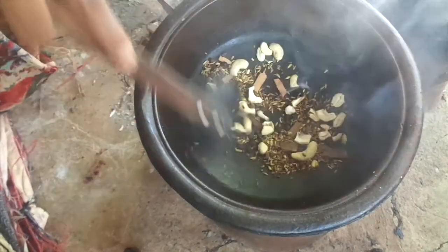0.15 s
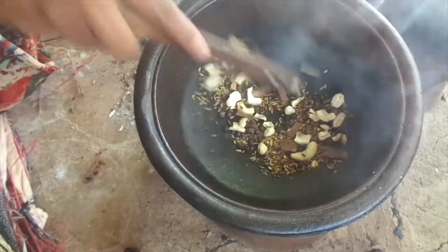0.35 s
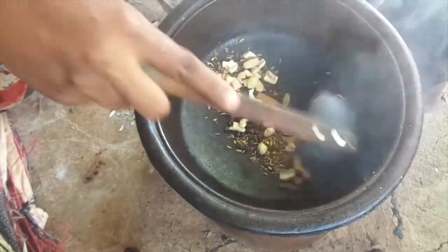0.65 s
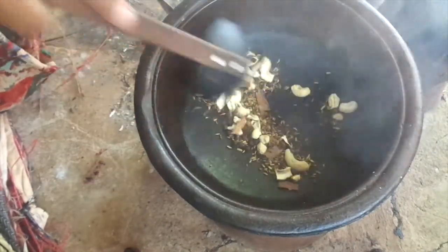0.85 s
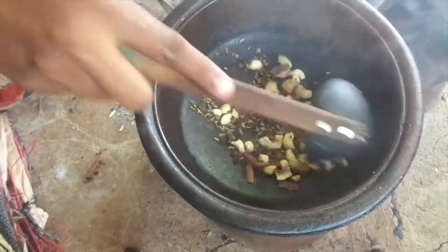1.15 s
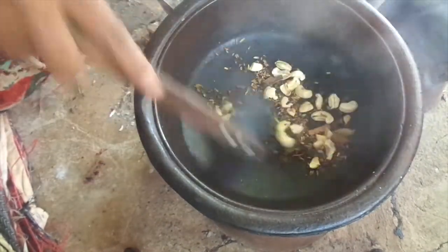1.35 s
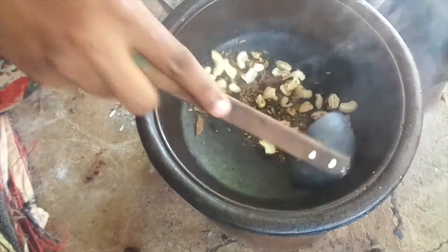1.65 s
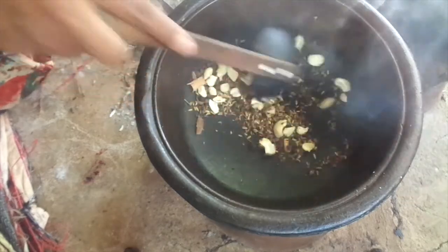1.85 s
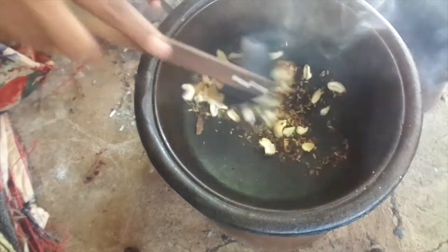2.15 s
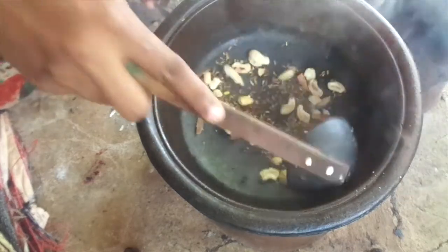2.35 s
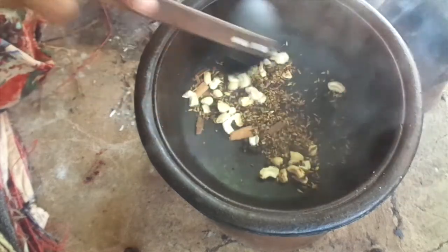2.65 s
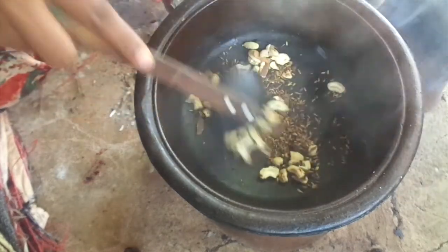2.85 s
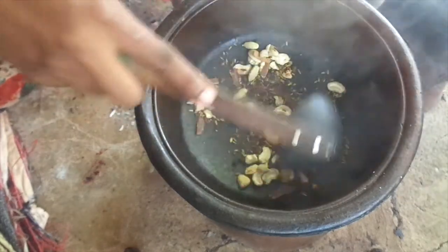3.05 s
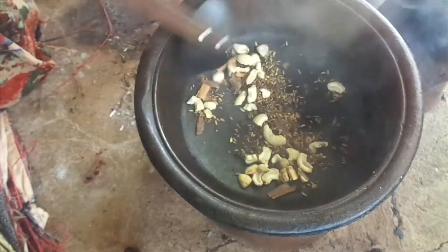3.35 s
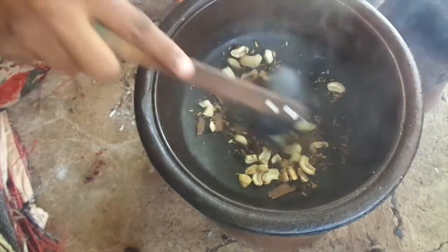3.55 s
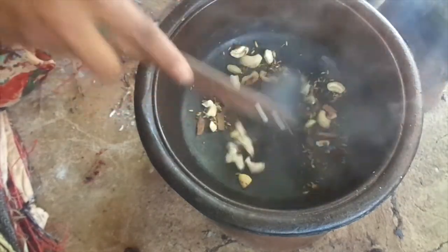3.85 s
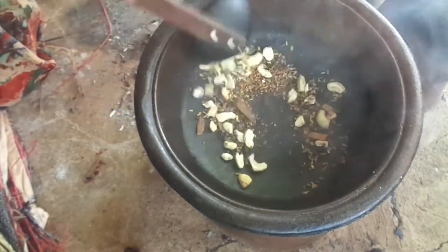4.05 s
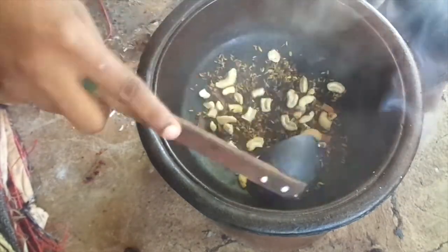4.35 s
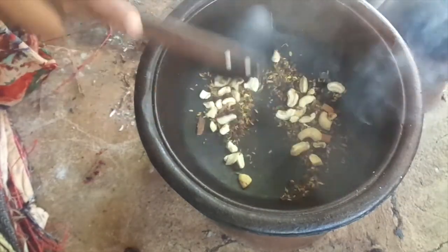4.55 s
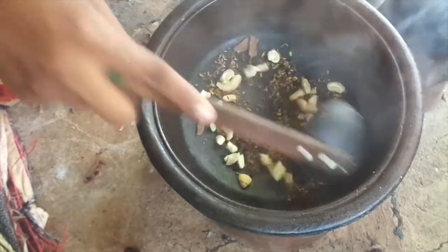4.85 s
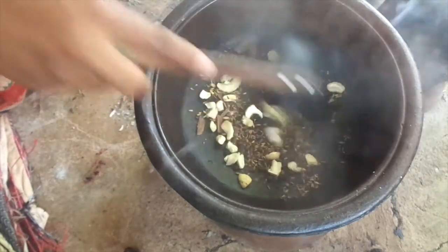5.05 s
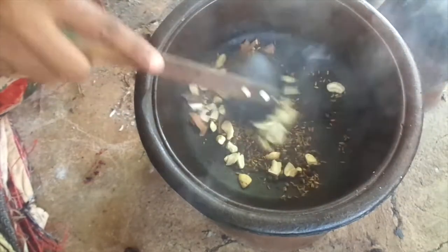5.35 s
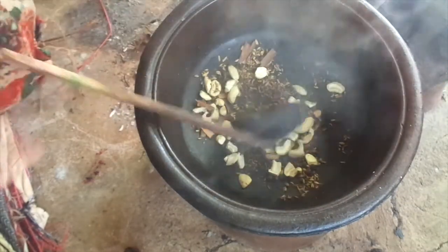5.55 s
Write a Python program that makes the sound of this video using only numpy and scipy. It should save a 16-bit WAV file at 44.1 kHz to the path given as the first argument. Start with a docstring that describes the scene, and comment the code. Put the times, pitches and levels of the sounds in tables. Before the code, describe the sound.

Close, dry scraping strokes of a metal ladle in an earthen pot, with hollow knocks, rustling seeds, sharp ticks and brief squeaks.

```python
"""A ladle stirs nuts and whole spices dry-roasting in a clay pot, close up, in mono.
About three strokes a second: filtered random contacts make its grinding, its rasp and the sliding seeds.
Knocks and a clink are damped modes with noise, squeals are resonated slips, snaps are tiny filtered bursts.
A faint echo and quiet open air surround the pot; near the start the sound drops out for a moment."""
import sys
import numpy as np
from scipy import signal
from scipy.fft import rfft, irfft, next_fast_len
from scipy.io import wavfile
from scipy.ndimage import uniform_filter1d, map_coordinates

SR = 44100
rng = np.random.default_rng(int(sys.argv[2]) if len(sys.argv) > 2 else 0)


def write(x):
    x = np.atleast_2d(x).T
    wavfile.write(sys.argv[1], SR, np.round(np.clip(x, -1, 1) * 32767).astype(np.int16))


N = 252252  # length in samples

PAUSE_START_S, PAUSE_END_S = 0.165, 0.196  # the momentary silence
TOP_HZ = 15400  # upper edge of the sound


def amp(db):
    """Decibels to gain."""
    return 10 ** (np.asarray(db) / 20)


def unit(x):
    """Scale to rms 1."""
    return x / np.sqrt(np.mean(x ** 2) + 1e-20)


def burst(x, span):
    """Scale a short sound to the energy of rms 1 held for span seconds."""
    return x * np.sqrt(span * SR / (np.sum(x ** 2) + 1e-20))


def add(track, s, sound):
    """Mix a sound in at s seconds."""
    start = max(round(s * SR), 0)
    part = track[start:start + len(sound)]
    part += sound[:len(part)]


def shaped(x, gain):
    """Filter x by a gain over frequency, with minimum phase so that attacks stay sharp."""
    size = 2 * next_fast_len(len(x) // 2 + 2048)
    wanted = np.maximum(gain(np.fft.rfftfreq(size, 1 / SR)), 1e-6)
    cepstrum = irfft(np.log(wanted))
    # folding the cepstrum onto positive time makes the filter causal
    cepstrum[1:size // 2] *= 2
    cepstrum[size // 2 + 1:] = 0
    response = np.exp(rfft(cepstrum))
    return irfft(rfft(x, size) * response)[:len(x)]


def coloured(x, points):
    """Filter x by a gain curve of (Hz, dB) points, joined on a log frequency axis."""
    f, db = np.transpose(points)
    return shaped(x, lambda hz: amp(np.interp(np.log(hz + 1), np.log(f), db)))


def hump(hz, centre, q):
    """Gain of one resonance."""
    return 1 / np.sqrt(1 + (q * (hz / centre - centre / (hz + 1))) ** 2)


def wobble(rate):
    """A smooth random curve, rate knots a second."""
    knots = rng.standard_normal(int(N * rate / SR) + 4)
    return map_coordinates(knots, [np.arange(N) * rate / SR])


def grains(count, rate, spread_db):
    """Tiny contacts over count samples: random moments, rate a second on average, random sizes and signs."""
    size_db = spread_db * np.clip(rng.standard_normal(count), -2, 2)
    sizes = amp(size_db) * rng.choice([-1, 1], count)
    return unit(sizes * (rng.random(count) < rate / SR))


def fading(t, t60):
    """Noise that dies away by 60 dB in t60 seconds."""
    return rng.standard_normal(len(t)) * amp(-60 * t / t60)


def ring(t, modes, length, scatter_db):
    """Damped modes; every blow lands elsewhere and shares its strength out anew."""
    hz, db, t60 = np.transpose(modes)[:, :, None]
    signs = rng.choice([-1, 1], hz.shape)
    strength = amp(db + scatter_db * rng.standard_normal(hz.shape)) * signs
    decay = np.exp(-np.log(1000) * t / (t60 * length))
    return np.sum(strength * np.sin(2 * np.pi * hz * t) * decay, axis=0)


# gain curve of the open air: freq_hz [Hz], level_db [dB]
AIR_CURVE = [(25, -24), (100, -1), (250, -1.5), (480, 2), (900, 1), (2500, -11), (6000, -11.5),
             (15000, -23)]


def outdoors():
    """Quiet open air as filtered noise, with a soft rush before the stirring starts."""
    air = amp(-55.5) * unit(coloured(rng.standard_normal(N), AIR_CURVE))
    rush_curve = [(60, -8), (400, -3), (1500, 3.5), (4000, -13.5)]
    rush = amp(-54) * unit(coloured(rng.standard_normal(N), rush_curve))
    return air + rush * (np.arange(N) / SR < PAUSE_START_S)


# modes of a light metal clink; the player shortens every decay to 0.8:
# freq_hz [Hz], level_db [dB, relative], t60_s [s, before shortening]
CLINK_MODES = [(1187, -14.5, 0.19), (1330, -21, 0.18), (1390, -21, 0.11), (2890, -7, 0.1), (4020, 0, 0.039),
               (5040, -14, 0.096), (5900, -18, 0.087), (7870, -17, 0.11)]


def clink():
    """A utensil is touched once: its metal modes ring over a tap of dying noise."""
    out, t = np.zeros(N), np.arange(SR // 5) / SR
    tap_curve = [(300, -38), (900, -4), (1400, 10.0), (4000, -7), (12000, -12)]
    tap = coloured(fading(t, t60=0.087), tap_curve)
    metal = unit(ring(t, CLINK_MODES, length=0.8, scatter_db=1)) + 0.8 * unit(tap)
    add(out, 0.0235, amp(-28) * burst(metal, span=0.0099))
    return out


def surroundings(x):
    """The pot and the ground throw back a short echo: x convolved with a dying noise tail."""
    t = np.arange(SR // 3) / SR
    onset = 1 - np.exp(-t / 0.011)
    tail_curve = [(100, -7), (500, -11.0), (3000, -18.5), (14000, -17.5)]
    tail = coloured(fading(t, t60=0.25) * onset, tail_curve)
    return signal.fftconvolve(x, tail / np.linalg.norm(tail))[:N]


def scuffs(rate, spread_db, t60):
    """Tiny contacts that each leave a short puff of noise."""
    t = np.arange(SR // 20) / SR
    puff_power = amp(-120 * t / t60)  # power, so the sound itself falls 60 dB in t60
    power = signal.fftconvolve(grains(N, rate, spread_db) ** 2, puff_power)[:N]
    return unit(np.sqrt(np.abs(power)) * rng.standard_normal(N))


def pings(count, pitch_hz, cycles, spread_db):
    """Seeds colliding as damped sines, each with its own moment, pitch and size."""
    when, pitch, size = rng.random((count, 3)).T[:, :, None]
    hz = pitch_hz * 2 ** (1.8 * (pitch - 0.5))  # 0.9 octave either way
    t = np.arange(SR // 100) / SR
    waves = amp(spread_db * size ** 2) * np.sin(2 * np.pi * hz * t) * np.exp(-hz * t / cycles)
    places = (when * N).astype(int) + np.arange(len(t))
    return unit(np.bincount(places.ravel(), waves.ravel(), N)[:N])


def wandering(x, depth_db):
    """The moving contact brings out different resonances from moment to moment."""
    z = signal.stft(x, nperseg=256)[2]
    field = uniform_filter1d(rng.standard_normal(z.shape), size=2, axis=0)  # across frequency
    field = uniform_filter1d(field, size=7, axis=1)  # across time
    return signal.istft(z * amp(depth_db * unit(field)), nperseg=256)[1][:N]


# strokes of the ladle; levels are for the end of the push, before the sag and the judder:
# start_s [s], push_s [s], fade_s [s per 20 dB], swell_db [dB over the push, negative weakens],
# grind_db [dB], rasp_db [dB], seeds_db [dB]
STROKE_TABLE = [(0.183, 0.21, 0.2, 10, -24, -34, -36), (0.614, .15, 0.05, 20, -28.5, -34, -37.5),
                (0.96, 0.098, 0.14, 10, -34.5, -32, -36), (1.261, 0.14, 0.15, 5.5, -25, -31, -34),
                (1.707, 0.11, 0.14, 19, -28.5, -27.5, -30.5), (2.102, 0.067, 0.17, 1.5, -36.5, -32, -36.5),
                (2.384, 0.099, 0.16, 13.5, -42.5, -39, -40.5), (2.733, 0.074, 0.41, 12, -42.5, -37, -42.5),
                (3.086, .1, 0.19, 6, -43.5, -41, -43.5), (3.433, 0.053, 0.11, 17, -35, -27.5, -32),
                (3.742, 0.11, 0.13, 3.5, -30.5, -34.5, -41), (4.08, 0.093, 0.11, 20.5, -29, -29.5, -33),
                (4.346, 0.15, .16, 4, -37.5, -41, -47), (4.712, 0.021, 0.17, -5, -36, -30.5, -38),
                (4.951, 0.024, 0.21, -9, -30, -40.5, -39.5), (5.02, 0.042, 0.13, 5.5, -26, -31, -37.5),
                (5.26, 0.094, 0.08, 7.5, -36.5, -31, -38), (5.52, 0.025, 0.1, 14, -42, -45, -56)]
STIR_START_S = STROKE_TABLE[0][0]
TOUCH_S = 0.007  # the edge settles on the clay
IDLE_SWING_DB = 4  # scale of the random swing between strokes


def effort(stroke_db, sag_db_per_s, idle_db):
    """Gain of one sound: strokes touch down, swell or weaken over the push, then fade as the ladle lifts."""
    t = np.arange(N) / SR
    power = amp(idle_db + IDLE_SWING_DB * wobble(12)) ** 2 * (t > STIR_START_S)
    for (start_s, push_s, fade_s, swell_db, *_), level_db in zip(STROKE_TABLE, stroke_db):
        pushed = np.clip(t - start_s, 0, push_s)
        lifted = np.maximum(t - start_s - push_s, 0)
        shape_db = swell_db * (pushed / push_s - 1) - sag_db_per_s * pushed - 20 * lifted / fade_s
        touch = np.clip((t - start_s) / TOUCH_S, 0, 1)
        power = power + (touch * amp(level_db + shape_db)) ** 2
    return np.sqrt(power)


# gain curves of the grinding, the rasp and the sliding seeds: freq_hz [Hz], level_db [dB]
GRIND_CURVE = [(40, -41), (140, -22), (220, -12), (310, -11), (390, -3.5), (520, 5.5), (640, 0.5),
               (800, -6), (1050, -12.5), (1350, -8), (1650, -29), (2600, -44)]
RASP_CURVE = [(1000, -15.5), (1600, -10.5), (1900, -2), (2150, 1.5), (2400, 3), (2850, 7.5), (3300, -0.5),
              (4200, 0), (5200, -5.5), (7500, -25)]
SEEDS_CURVE = [(2500, -28), (5000, -5.5), (6500, -2), (8500, 0), (11500, -2), (13500, -4), (15500, -27)]
# modes of the ladle, rung by its scraping edge: freq_hz [Hz], level_db [dB, relative]
LADLE_MODES = [(2140, 3), (2560, -3.5), (2860, -4), (3230, -5), (3540, -1), (4250, -6)]
GRIP_DB = 5.5  # scale of the swing in grip on each ladle mode
GRIND_SAG_DB_PER_S, SEEDS_SAG_DB_PER_S = 65.5, 13.5  # the edge skims and the heap thins out in a push
IDLE_GRIND_DB, IDLE_RASP_DB, IDLE_SEEDS_DB = -53.5, -54, -58  # drifting back among rolling seeds
BUMP_DB, HEAVY_PUSH_DB = -34.5, -30  # bumping level when the grinding gain is at the second figure
BUMP_GROWTH = 1.8  # dB of bumping gained per dB of grinding


def stirring():
    """In each stroke coarse bumps shake the bowl, grit rasps under the edge, and seeds tumble ahead."""
    *_, grind_db, rasp_db, seeds_db = np.transpose(STROKE_TABLE)
    pressure = effort(grind_db, GRIND_SAG_DB_PER_S, IDLE_GRIND_DB)
    judder = wobble(70)  # the pressure of the edge is never even
    grit = scuffs(rate=700, spread_db=5, t60=0.023)
    nuts = scuffs(rate=60, spread_db=3, t60=0.008)

    # the lowest notes of the bowl come up with a heavy push
    hollow_gain = lambda hz: hump(hz, 333.4, q=5.7) ** 2 + 0.32 * hump(hz, 252, q=2.5) ** 2
    hollow = unit(shaped(grains(N, rate=330, spread_db=3), hollow_gain))
    bumping = hollow * amp(BUMP_DB) * (pressure / amp(HEAVY_PUSH_DB)) ** BUMP_GROWTH

    grind = unit(coloured(grains(N, rate=300, spread_db=3) + 0.36 * nuts, GRIND_CURVE))

    singing = np.zeros(N)
    for mode_hz, mode_db in LADLE_MODES:
        contacts = grains(N, rate=1500, spread_db=2)
        mode = shaped(contacts, lambda hz: amp(mode_db) * hump(hz, mode_hz, q=72))
        singing += mode * amp(GRIP_DB * wobble(14))
    scrape = unit(wandering(coloured(grit + 0.6 * nuts, RASP_CURVE), depth_db=5.5))
    rasp = unit(scrape + 0.63 * unit(singing))

    ticks = pings(count=9000, pitch_hz=7600, cycles=5, spread_db=15)
    seeds = unit(coloured(0.9 * ticks + grit + 0.35 * nuts, SEEDS_CURVE))

    return (grind * pressure * amp(1.93 * judder)
            + bumping
            + rasp * effort(rasp_db, 0, IDLE_RASP_DB) * amp(1.36 * judder)
            + seeds * effort(seeds_db, SEEDS_SAG_DB_PER_S, IDLE_SEEDS_DB) * amp(judder))


# ladle against the pot: start_s [s], boom_db [dB], thud_db [dB], wall_db [dB],
# bright_hz [Hz, centre of the wall sound's emphasis], length [share of the modes' t60]
KNOCK_TABLE = [(0.2273, -33, -33, -63, 2800, 0.31), (0.2512, -28, -30.5, -43, 1320, 2.5),
               (0.5722, -24, -47, -49, 1220, 0.63), (.631, -51, -34, -51, 2970, 0.3),
               (.747, -26, -29, -51, 2160, 0.19), (0.9448, -22, -37, -9.5, 1790, 0.11),
               (.949, -29, -17, -15.5, 1870, 0.62), (1.2557, -21.5, -28, -33, 1230, 0.62),
               (1.366, -26.5, -27, -54, 2500, 0.68), (2.121, -34, -29, -58, 2500, 0.27),
               (2.385, -36.5, -34, -54, 1300, 0.81), (2.402, -36.5, -34, -46, 1300, 0.32),
               (2.571, -50, -51, -39.5, 1580, 1.3), (2.724, -15.5, -23.5, -8.5, 1530, 0.78),
               (3.138, -34, -15.5, -23, 1410, 0.21), (3.367, -18.5, -24.5, -14.5, 1300, 0.73),
               (3.4319, -24, -10, -19, 1350, 0.27), (3.6981, -16.5, -29, -35.5, 1230, 1.1),
               (3.754, -20.5, -29, -46, 1250, 0.69), (4.0615, -17, -26.5, -8.5, 2200, 0.82),
               (4.41, -42, -31, -37, 2530, 1.8), (4.917, -17, -28, -18.5, 1160, 0.8),
               (4.9557, -19, -19.5, -30, 1300, 0.47), (5.4873, -17.5, -18.5, -21, 1590, 0.62),
               (5.515, -23.5, -30, -33, 2120, 0.49), (5.647, -31.5, -29.5, -33.5, 2080, 0.81),
               (5.678, -42, -32, -33, 1730, .8)]
# modes of the clay wall and of the hollow bowl:
# freq_hz [Hz], level_db [dB, relative], t60_s [s, before the length share]
WALL_MODES = [(890, -0.5, 0.15), (1239, 4.5, 0.14), (1320, 6, 0.045), (1403, -7.5, 0.16), (1570, -8, 0.21),
              (1574, 6.5, 0.04), (1883, -4.5, 0.19), (2057, 5.5, 0.054), (2270, 4.5, 0.11), (2366, 4, 0.11),
              (2547, 9.5, 0.053), (2670, -5, 0.062), (3524, 8, 0.038), (4160, 9.5, 0.025),
              (4950, 13.5, 0.04), (6250, -2, 0.028)]
BOWL_MODES = [(343, -14.5, 0.074), (427.3, -4.5, 0.12), (473.5, -2, 0.14), (516, 1, 0.04)]
# gain curve of the dull thud: freq_hz [Hz], level_db [dB]
THUD_CURVE = [(40, -66), (140, -30.5), (250, -12), (400, 0), (560, 3.5), (750, -2.5), (1000, -8.5),
              (1500, -20.5), (3000, -21), (9000, -38.5)]


def knocks():
    """A blow gives a thud, a bowl boom and a wall ring, cut short if the ladle stays pressed on."""
    out, t = np.zeros(N), np.arange(SR // 3) / SR
    for start_s, boom_db, thud_db, wall_db, bright_hz, length in KNOCK_TABLE:
        boom = ring(t, BOWL_MODES, length, scatter_db=0.5) * (1 - np.exp(-t / 0.0024))
        thud = coloured(fading(t, t60=0.0056) + 0.19 * fading(t, t60=0.079), THUD_CURVE)
        clay = ring(t, WALL_MODES, length, scatter_db=1.5)
        clatter = fading(t, t60=0.012) + 0.22 * fading(t, t60=0.12)
        # a broad and a narrow resonance lift the wall sound around bright_hz
        emphasis = lambda hz: hump(hz, bright_hz, q=0.78) + 0.64 * hump(hz, bright_hz, q=20.0)
        wall_gain = lambda hz: emphasis(hz) * hump(hz, 1410, q=0.45) / np.hypot(1, hz / 7000)
        wall = shaped(unit(clay) + 1.12 * unit(clatter), wall_gain)
        for part, level_db in (boom, boom_db), (thud, thud_db), (wall, wall_db):
            add(out, start_s, amp(level_db) * burst(part, span=0.009))
    return out


# individually timed snaps of seeds and ticks of seeds against the pot:
# start_s [s], crack_db [dB], answer_db [dB]
SNAP_TABLE = [(.433, -29.5, -29), (.632, -33, -31.5), (.751, -29, -44), (.768, -27, -37),
              (1.0402, -21, -21), (1.2703, -11, -31), (1.967, -49, -32), (1.991, -24, -24.5),
              (2.046, -23.5, -27.5), (2.086, -40, -38), (2.11, -27, -38), (2.156, -29, -24),
              (2.314, -15.5, -22.5), (2.382, -34, -38), (2.689, -34.5, -36.5), (2.7311, -8, -12.5),
              (3.111, -29, -39.5), (3.1975, -30.5, -30), (3.2465, -30, -40.5), (3.6528, -24, -19),
              (3.98, -37, -36), (4.044, -28.5, -40), (4.165, -20, -36), (4.178, -21, -31),
              (4.298, -33, -37), (4.351, -24.5, -23), (4.377, -41, -24), (4.587, -23.5, -28.5),
              (4.66, -50, -34), (4.7145, -32, -43), (4.722, -23.5, -39), (4.8442, -37.5, -29),
              (5.168, -51.5, -40), (5.331, -27.5, -28), (5.42, -17.5, -27)]
SNAP_HZ, SNAP_SPREAD = 11340, 0.046  # pitch of a crack, and its scatter (share)
SMALL_SNAP_DB, SMALL_ANSWER_DB = -42, -39.5  # centre levels of the faint snaps in between


def faint_snaps(count):
    """Faint snaps at random moments of the stirring: start_s, crack_db, answer_db."""
    slots = (np.arange(count) + rng.random(count)) / count  # one in each equal slice of time
    when = STIR_START_S + (N / SR - STIR_START_S) * slots
    scatter_db = 3 * rng.standard_normal((count, 2))
    return np.column_stack([when, [SMALL_SNAP_DB, SMALL_ANSWER_DB] + scatter_db])


def snaps():
    """A seed cracks or ticks within a millisecond or two; the pot answers with a short, lower rattle."""
    out, t = np.zeros(N), np.arange(SR // 10) / SR
    for start_s, crack_db, answer_db in [*SNAP_TABLE, *faint_snaps(count=44)]:
        pitch_hz = SNAP_HZ * np.exp(SNAP_SPREAD * rng.standard_normal())
        shell = fading(t, t60=0.0023) + 0.04 * fading(t, t60=0.05)
        crack = shaped(shell, lambda hz: hump(hz, pitch_hz, q=1.33) / np.hypot(1, (hz / 13000) ** 6))
        rattle = fading(t, t60=0.016) + 0.076 * fading(t, t60=0.13)
        answer = shaped(rattle, lambda hz: hump(hz, 2400, q=0.51))
        add(out, start_s, amp(crack_db) * burst(crack, span=0.0016))
        add(out, start_s, amp(answer_db) * burst(answer, span=0.0022))
    return out


# the edge sticks and slips on the clay: peak_s [s, middle of the swell],
# level_db [dB, before a 4.5 dB trim], length_s [s, half the whole swell], pitch_hz [Hz], sharpness [Q]
SQUEAL_TABLE = [(0.351, -26, 0.013, 2770, 1.2), (1.442, -20.5, 0.016, 2980, 4.7),
                (1.832, -19, .028, 3240, 0.33), (2.189, -18.5, 0.013, 2135, 55),
                (2.489, -30, 0.032, 2690, 18), (2.833, -28, 0.023, 4070, 2.7),
                (2.996, -30, 0.0067, 2390, 2.3), (3.515, -26, 0.029, 2120, 36),
                (3.863, -28, 0.015, 2120, 45), (3.883, -21.5, 0.016, 2145, 160),
                (4.175, -13, 0.01, 2660, 1.2), (4.196, -30, 0.064, 2230, 25),
                (4.477, -32.5, 0.041, 2160, 19), (4.776, -25, 0.014, 2140, 14),
                (5.361, -16, 0.015, 2620, 7), (5.378, -25.5, 0.039, 2150, 34),
                (5.459, -31.5, 0.028, 2170, 12)]


def squeals():
    """Bursts of quick slips ring the edge of the ladle."""
    out = np.zeros(N)
    for peak_s, level_db, length_s, pitch_hz, sharpness in SQUEAL_TABLE:
        count = int(2 * length_s * SR)
        edge = lambda hz: hump(hz, pitch_hz, sharpness) * hump(hz, pitch_hz, q=3.0)
        slips = shaped(grains(count, rate=4300, spread_db=8), edge)
        swell = burst(slips * np.hanning(count), length_s)
        add(out, peak_s - length_s, amp(level_db - 4.5) * swell)
    return out


def low_thump():
    """A soft, deep thump under the hardest knock: one smooth pulse that rises and dies away."""
    out, u = np.zeros(N), np.arange(SR // 3) / SR / 0.0012  # time in units of the 1.2 ms rise
    add(out, 0.947, amp(-37) * burst(u * np.exp(-u), span=0.009))
    return out


def scene():
    """All the sounds of the pot over the open air, the same in both channels."""
    contacts = clink() + knocks() + snaps() + squeals() + low_thump()
    mono = stirring() + contacts + amp(-16.5) * surroundings(contacts) + outdoors()
    return np.array([mono, mono])


def record(dry):
    """Peaks clip at full scale, the sound drops out briefly near the start, and the top is cut off."""
    t = np.arange(N) / SR
    sound = np.clip(dry, -1, 1) * ((t < PAUSE_START_S) | (t > PAUSE_END_S))
    size = next_fast_len(N + SR // 2)
    low_pass = 1 / np.sqrt(1 + (np.fft.rfftfreq(size, 1 / SR) / TOP_HZ) ** 120)
    return irfft(rfft(sound, size) * low_pass, size)[:, :N]


dry = scene()
out = record(dry)
write(out)
```